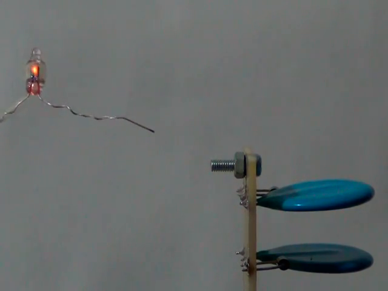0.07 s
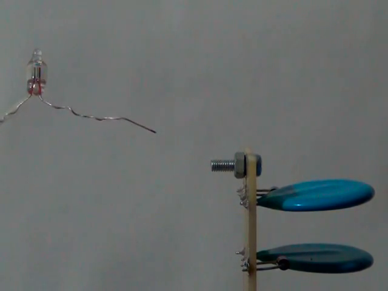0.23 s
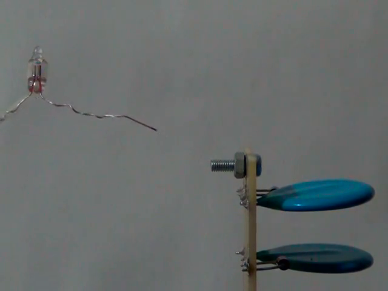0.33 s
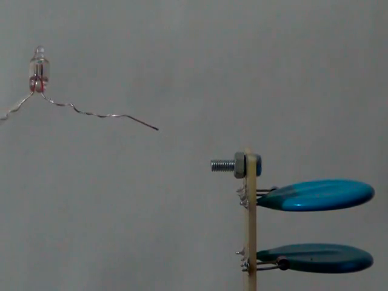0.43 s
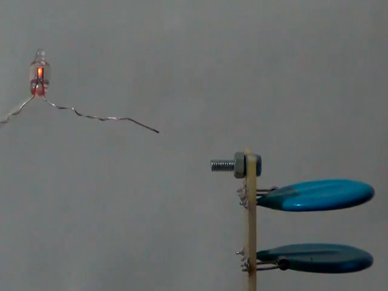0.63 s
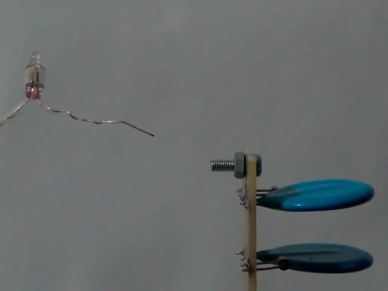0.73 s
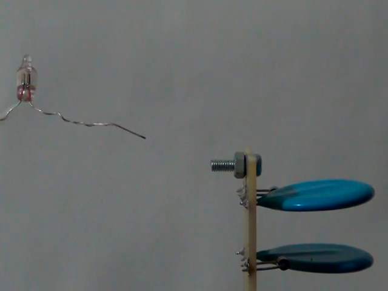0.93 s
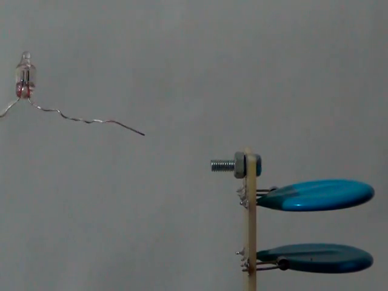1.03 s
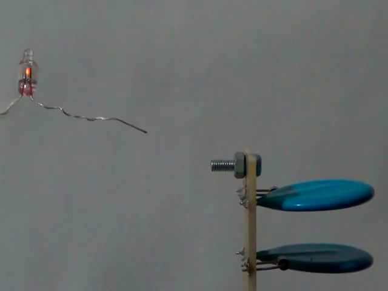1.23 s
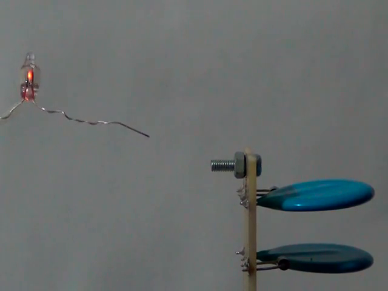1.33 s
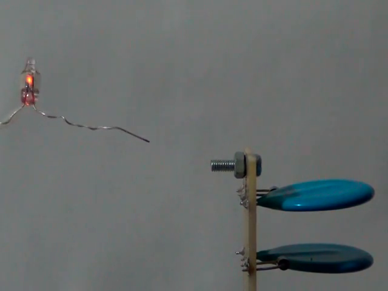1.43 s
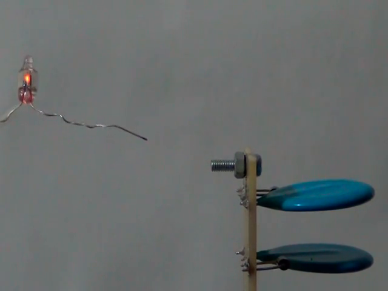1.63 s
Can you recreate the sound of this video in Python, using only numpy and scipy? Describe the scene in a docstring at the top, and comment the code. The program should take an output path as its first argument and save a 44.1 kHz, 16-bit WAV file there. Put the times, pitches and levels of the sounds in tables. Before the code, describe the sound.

Two sharp electric spark cracks over a high-pitched electronic whine.

```python
"""Sparking high voltage supply.

The supply whines in a small room, its oscillator locked to the mains ripple. Twice its capacitors
discharge across a gap: a sharp crack, wall echoes and an electrical thump in the microphone lead.
After each spark the loaded oscillator sings lower and glides up through the transformer's resonances."""
import sys
import numpy as np
from scipy import signal
from scipy.fft import rfft, irfft, next_fast_len
from scipy.io import wavfile
from scipy.ndimage import map_coordinates

SR = 44100
rng = np.random.default_rng(int(sys.argv[2]) if len(sys.argv) > 2 else 0)


def transcribe(u):
    """Save the signal u as a 16-bit wav file named by the first command-line argument.

    u: samples, shape (n,) or (channels, n), limited to [-1, 1]; the rate is SR.
    q: integer samples, one column per channel.
    """
    v = np.clip(np.atleast_2d(u).T, -1, 1)
    q = np.round(v * 32767).astype(np.int16)
    wavfile.write(sys.argv[1], SR, q)


N = 74970


def amp(db):
    """Decibels to gain."""
    return 10 ** (np.asarray(db) / 20)


def unit(x):
    """Scale to rms 1."""
    return x / np.sqrt(np.mean(x ** 2) + 1e-20)


def clock():
    """Sample times in s."""
    return np.arange(N) / SR


def along(points, hz):
    """Interpolate (f/Hz, value) points over log frequency."""
    f, values = np.transpose(points)
    return np.interp(np.log(hz + 1), np.log(f + 1), values)


def wobble(knots_per_s):
    """Smooth random curve."""
    knots = rng.standard_normal(int(N * knots_per_s / SR) + 4)
    return map_coordinates(knots, [clock() * knots_per_s])


def filtered(x, response):
    """Apply a frequency response."""
    size = next_fast_len(N + SR // 2)
    return irfft(rfft(x, size) * response(np.fft.rfftfreq(size, 1 / SR)), size)[..., :N]


def coloured(x, spectrum):
    """Shape x by (f/Hz, gain/dB) points."""
    return filtered(x, lambda hz: amp(along(spectrum, hz)))


def noise(spectrum):
    """Coloured noise of rms 1."""
    return unit(coloured(rng.standard_normal(N), spectrum))


def stereo(mid, side):
    """Mid/side to left/right."""
    return np.array([mid + side, mid - side])


def click(spectrum, size=1024):
    """Coloured minimum-phase impulse of peak 1."""
    cepstrum = irfft(np.log(amp(along(spectrum, np.fft.rfftfreq(size, 1 / SR)))))
    cepstrum[1:size // 2] *= 2
    cepstrum[size // 2 + 1:] = 0
    impulse = irfft(np.exp(rfft(cepstrum)))
    return impulse / np.abs(impulse).max()


def delayed(x, delay_s):
    """Delay x within N samples."""
    start = max(round(delay_s * SR), 0)
    out = np.zeros(N)
    out[start:start + len(x)] = x[:N - start]
    return out


# Hiss spectrum: f/Hz, level/dB
HISS_SPECTRUM = [(25, -30), (60, -5), (130, 0.5), (300, -3), (600, -5.5), (900, 2.5), (1150, 0),
                 (1400, -5.5), (3000, -6.5), (5500, -5), (7000, -9), (10600, -7.5), (11400, -48)]
# Extra side filter: f/Hz, gain/dB
HISS_SIDE = [(60, 0), (200, -8.5), (700, -7.5), (1300, -10), (3000, -8), (6000, 0), (11000, -14)]


def room_hiss(level_db=-55):
    """Faint, steady room noise."""
    mid = noise(HISS_SPECTRUM)
    side = coloured(noise(HISS_SPECTRUM), HISS_SIDE)
    return amp(level_db) * stereo(mid, side)


# Strong lines: ripple harmonic -> level/dB
WHINE_LINES = {9: -44, 17: -61, 26: -47.5, 27: -57, 28: -53, 29: -60, 35: -52, 44: -55.5, 52: -61.5, 70:
               -47, 79: -56.5, 86: -62.5}
# Weak lines between them: f/Hz, level/dB
WEAK_LINES = [(120, -72.5), (300, -79), (700, -75), (1100, -64.5), (1400, -74), (1850, -66), (2400, -77),
              (3000, -70.5), (4200, -74.5), (4850, -59.5), (5500, -68.5), (6000, -66), (6350, -58.5),
              (6850, -95), (7250, -60), (7800, -60.5), (8150, -70), (8500, -65), (8800, -64), (9350, -67.5),
              (9900, -78), (10400, -64.5), (11000, -83)]
# Lines the overshoot pushes into resonances: ripple harmonic -> boost/dB
OVERSHOOT_BOOST = {52: 3, 70: 10.2, 79: 5}
# Whine envelope: t/s, gain/dB
WHINE_ENVELOPE = [(0, 0), (.2, 0), (.6, -1), (.72, 0), (1.12, -1.5), (1.3, -2.5), (1.7, -0.8)]
RIPPLE_HZ = 120.03


def idle_whine(harmonics=92, lock_s=0.023, settle_delay_s=0.077, settle_width_s=0.0844,
               overshoot=0.00277, scatter_rad=1.16):
    """The idle oscillator repeats with the ripple; a spark stops it, and it relocks briefly sharp."""
    t = clock()
    locked, settling, tone = np.ones(N), np.zeros(N), np.zeros(N)
    for spark_s, _, charged_s in SPARKS:
        locked *= np.where(t < spark_s, 1, .5 + .5 * np.tanh((t - charged_s) / (2 * lock_s)))
        settling += np.exp(-((t - charged_s - settle_delay_s) / settle_width_s) ** 2)
    phase = 2 * np.pi * RIPPLE_HZ * np.cumsum(1 + overshoot * settling) / SR
    for k, offset in enumerate(scatter_rad * rng.standard_normal(harmonics), 1):
        line_db = WHINE_LINES.get(k, along(WEAK_LINES, k * RIPPLE_HZ))
        boost_db = OVERSHOOT_BOOST.get(k, 0) * settling
        tone += amp(line_db + boost_db) * np.cos(k * phase + offset)
    envelope = amp(np.interp(t, *np.transpose(WHINE_ENVELOPE)))
    return np.sqrt(2) * tone * locked * envelope


# Transformer resonances: f/Hz, width/Hz, gain/dB
TRANSFORMER_MODES = [(1090, 120, -6.5), (1801, 91, -3), (2970, 290, -4), (3390, 100, -8), (4950, 74, -12),
                     (5660, 89, 8), (5940, 130, 2), (6194, 57, 7.5), (7200, 180, -2), (7825, 270, 4),
                     (9160, 240, -3), (13440, 370, -15)]
# Response between resonances: f/Hz, gain/dB
TRANSFORMER_FLOOR = [(700, -44), (1000, -21.5), (1900, -20.5), (4000, -21.5), (4800, -14), (8500, -18),
                     (10500, -20.5), (13000, -25), (14200, -43)]


def transformer_gain(hz):
    """Resonances add in power over a broad floor."""
    mode_power = sum(amp(db) ** 2 / (1 + (2 * (hz - mode_hz) / width_hz) ** 2) ** 2
                     for mode_hz, width_hz, db in TRANSFORMER_MODES)
    return np.sqrt(amp(along(TRANSFORMER_FLOOR, hz)) ** 2 + mode_power)


# Oscillator pitch, one curve per spark: t/s, f/Hz
RECHARGE_PITCH = [
    [(.27, 690), (.367, 810), (.387, 845), (.417, 886), (.442, 925), (.462, 950), (.487, 975), (.517, 1018),
     (.548, 1048), (.60, 1053)],
    [(.77, 700), (.85, 812), (.895, 886), (.915, 930), (.935, 945), (.98, 947), (1.015, 975), (1.05, 1015),
     (1.085, 1048), (1.13, 1053)],
]
# Oscillator drive, one curve per spark: t/s, level/dB
RECHARGE_DRIVE = [
    [(.28, -41), (.37, -38.5), (.42, -39.5), (.46, -39), (.5, -40.5), (.545, -42.5), (.6, -53)],
    [(.78, -41), (.87, -47), (.94, -38.5), (.965, -40.5), (1.01, -41), (1.08, -44.5), (1.13, -59)],
]


def recharge(harmonics=15, ripple_swing=.045, crest_sharpness=5, jitter=0.0018, sizzle_db=-8.5):
    """The loaded oscillator climbs over a faint sizzle; overtones flare at transformer resonances."""
    t, tone, drive = clock(), np.zeros(N), np.zeros(N)
    for pitch_curve, drive_curve in zip(RECHARGE_PITCH, RECHARGE_DRIVE):
        knots_s, knots_hz = np.transpose(pitch_curve)
        on = (t > knots_s[0]) & (t < knots_s[-1])
        ripple = np.cos(2 * np.pi * RIPPLE_HZ * t[on] + rng.uniform(0, 2 * np.pi))
        crest = np.exp(crest_sharpness * (ripple - 1))  # each crest hurries the oscillator
        bend = 1 + ripple_swing * (crest - crest.mean()) + jitter * wobble(300)[on]
        pitch_hz = np.interp(t[on], knots_s, knots_hz) * bend
        phase = 2 * np.pi * np.cumsum(pitch_hz) / SR
        for k in range(1, harmonics + 1):
            tone[on] += np.sqrt(2) * np.sin(k * phase + rng.uniform(0, 2 * np.pi))
        drive[on] = amp(np.interp(t[on], *np.transpose(drive_curve)))
    sizzle = amp(sizzle_db) * drive * noise(TRANSFORMER_FLOOR)
    return filtered(drive * tone, transformer_gain) + sizzle


# Side filter: f/Hz, gain/dB
SUPPLY_SIDE = [(1000, -25), (2400, -51.5), (4400, -23), (8000, -20.5), (13000, -17)]


def supply():
    """The supply's sound reaches the two microphones slightly out of phase."""
    mid = recharge() + idle_whine()
    side = filtered(mid, lambda hz: 1j * amp(along(SUPPLY_SIDE, hz)))
    return stereo(mid, side)


# Sputters, opposite in the two channels: peak t/s, level/dB, rise/s, fall/s
SPUTTERS = [(0.2328, -15, 0.0061, 0.0035), (0.735, -17, 0.0019, 0.0048)]
# Sputter spectrum: f/Hz, level/dB
SPUTTER_SPECTRUM = [(25, -14), (70, -4), (150, -4), (380, -0.5), (700, -8.5), (1200, -13), (2500, -29)]
# Electrical thumps: t/s, level/dB, width/ms, polarity, left minus right/dB
THUMPS = [(.237, -13.5, 0.24, 1, 5), (0.2375, -33.5, 1.33, 1, 0), (0.7347, -13.5, 0.2, -1, 7.5),
          (0.7377, -18.5, 0.1, -1, 3), (0.7376, -19.5, 1.24, 1, -4), (0.7401, -13, 0.28, 1, 2)]


def lead_pickup(sputter_mid_db=-20.5, cut_hz=43, cut_q=1.25):
    """The breakdown couples into the microphone lead; sputter and thumps ring the input's low cut."""
    t, out = clock(), np.zeros((2, N))
    for peak_s, db, rise_s, fall_s in SPUTTERS:
        envelope = np.exp(-np.maximum((peak_s - t) / rise_s, (t - peak_s) / fall_s))
        sputter = unit(envelope * noise(SPUTTER_SPECTRUM)) * np.sqrt(np.mean(envelope ** 2))
        out += amp(db) * stereo(amp(sputter_mid_db) * sputter, sputter)
    for peak_s, db, width_ms, polarity, pan_db in THUMPS:
        pulse = np.sign(polarity) * np.exp(-((t - peak_s) * 1000 / width_ms) ** 2 / 2)
        out += amp([[db + pan_db / 2], [db - pan_db / 2]]) * pulse
    return filtered(out, lambda hz: -hz ** 2 / (cut_hz ** 2 - hz ** 2 + 1j * hz * cut_hz / cut_q))


# Room decay: f/Hz, T60/s
ROOM_T60 = [(1000, 1), (3000, 0.43), (6000, 0.53), (8000, 0.31), (13000, 0.24)]


def room_tail(rise_s=0.005, level_hold_s=0.055):
    """The reverberation swells, is held level as if by a limiter, then dies faster in the treble."""
    hz, t, frames = signal.stft(noise(CRACK_SPECTRUM), SR, nperseg=256)
    fade = amp(-60 * np.maximum(t - level_hold_s, 0) / along(ROOM_T60, hz)[:, None])
    _, tail = signal.istft(frames * fade, SR, nperseg=256)
    return tail[:N] * (1 - np.exp(-clock() / rise_s))


# Discharges: t/s, level/dB, recharged t/s
SPARKS = [(0.2365, 0, 0.517), (.7407, -0.5, 1.059)]
# Crack spectrum: f/Hz, level/dB
CRACK_SPECTRUM = [(300, -46.5), (800, -29.5), (1500, -20.5), (3000, -16), (5000, -9.5), (6500, -6),
                  (7900, 0.5), (9200, -5), (11000, -11.5), (14200, -20.5), (14900, -34)]
# Direct path and wall echoes: delay/ms
PATH_MS = [0, 1.8, 6.1, 7.9, 8.9, 10.4, 12.6, 14.4, 21.5, 22.4, 23.8, 27, 31.5, 36.5, 43.5]
# Same paths: gain/dB
PATH_DB = [-2.5, -0.5, -17, -3.5, 2.5, -7, -19, -12, -20, -22, -17, -3.5, -7.5, -25, -12]
# Side filter: f/Hz, gain/dB
SPARK_SIDE = [(700, -16), (1300, -47), (2400, -57), (4400, -16.5), (8000, -7.5), (14000, -18.5)]


def sparks(click_db=-11, ring_hz=8190, ring_s=0.00045, ring_db=-3, tail_db=-19):
    """Each discharge is one crack that rings the microphone and echoes off the same walls."""
    impulse = click(CRACK_SPECTRUM)
    t = np.arange(len(impulse)) / SR
    mic_ring = np.cos(2 * np.pi * ring_hz * t) * np.exp(-t / ring_s)
    crack = amp(click_db) * impulse + amp(ring_db) * mic_ring
    early = np.array([amp(db) * delayed(crack, ms / 1000) for ms, db in zip(PATH_MS, PATH_DB)])
    mid = early.sum(0) + amp(tail_db) * room_tail()
    side = rng.choice([-1, 1], len(early)) @ early + amp(tail_db) * room_tail()
    bang = stereo(mid, coloured(side, SPARK_SIDE))
    return sum(amp(db) * np.array([delayed(channel, spark_s) for channel in bang])
               for spark_s, db, _ in SPARKS)


def scene():
    """Stereo sum of all sources."""
    return supply() + room_hiss() + sparks() + lead_pickup()


# Microphone roll-off: f/Hz, gain/dB
MIC_TREBLE = [(14200, 0), (14700, -9), (15700, -38)]


def record(dry, ceiling=0.42, band_limit_hz=15730):
    """The input rounds off the tallest peaks, loses the top treble and cuts at its band limit."""
    rounded = dry / (1 + (dry / ceiling) ** 6) ** (1 / 6)
    return filtered(coloured(rounded, MIC_TREBLE), lambda hz: hz < band_limit_hz)


dry = scene()
out = record(dry)
transcribe(out)
```